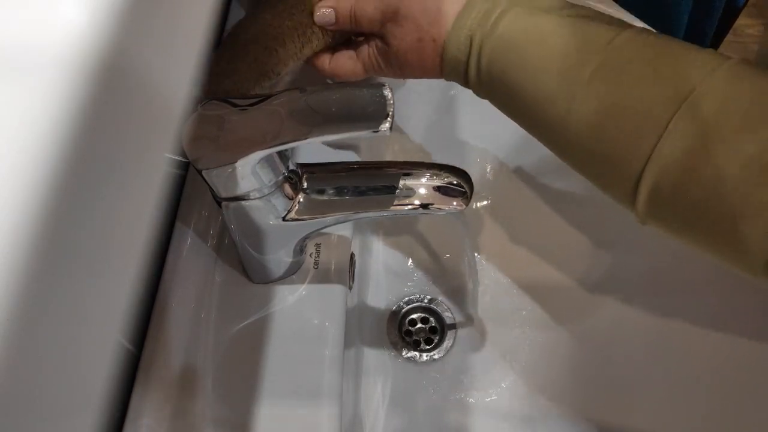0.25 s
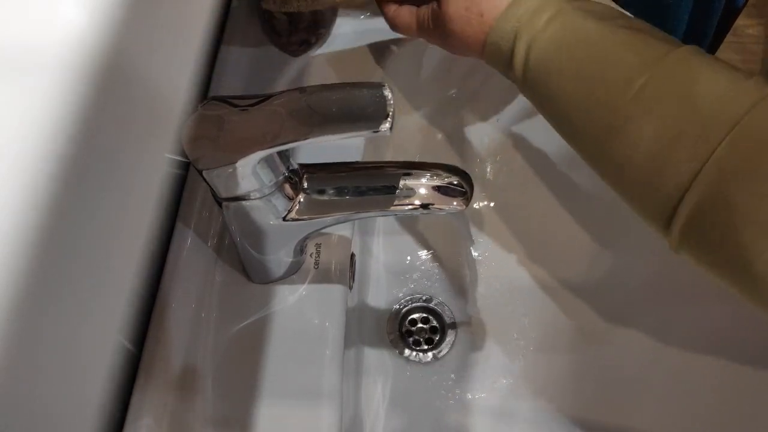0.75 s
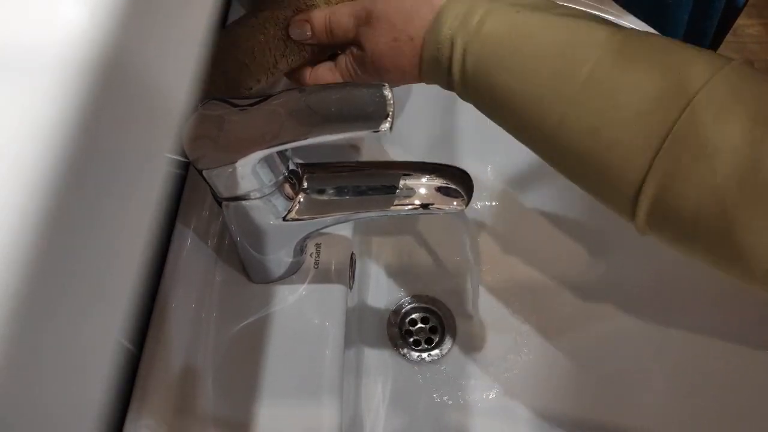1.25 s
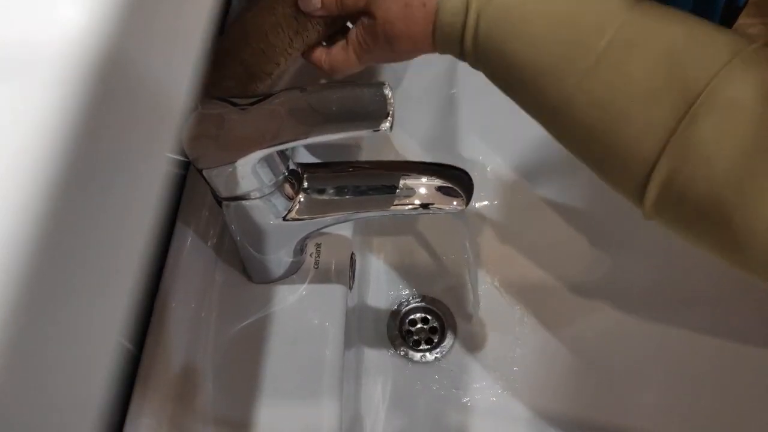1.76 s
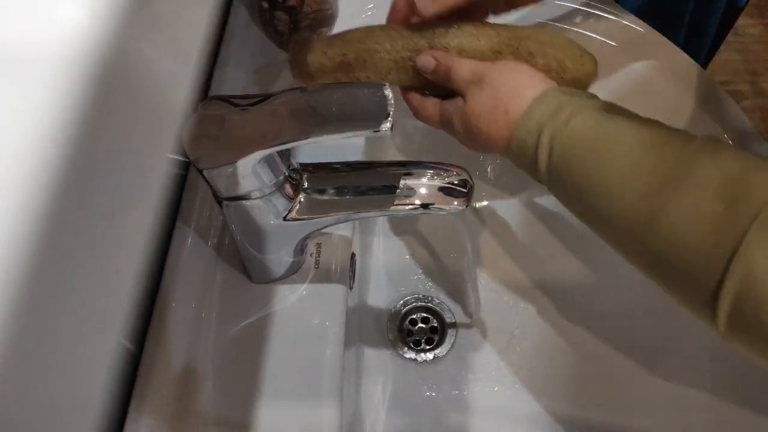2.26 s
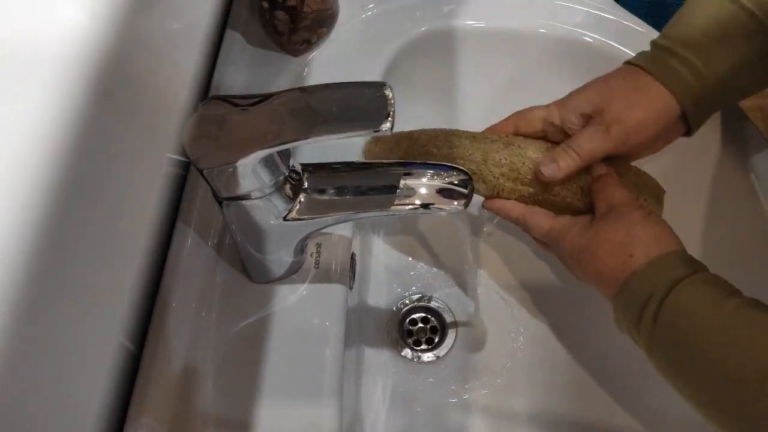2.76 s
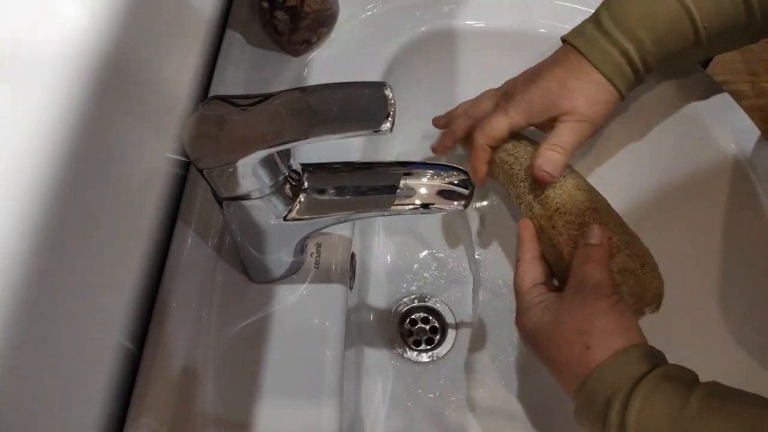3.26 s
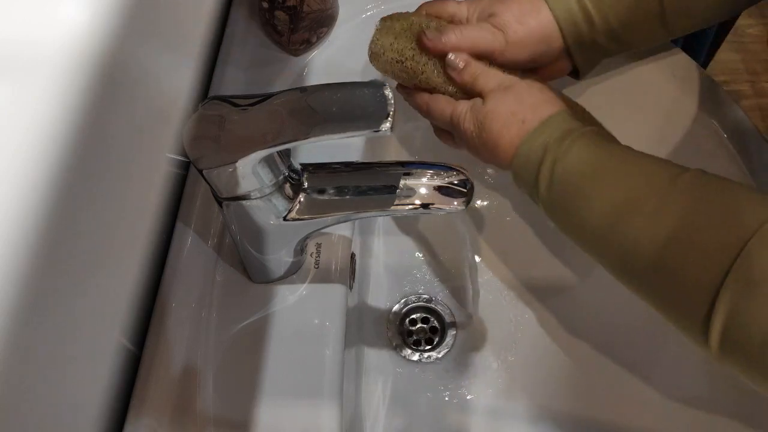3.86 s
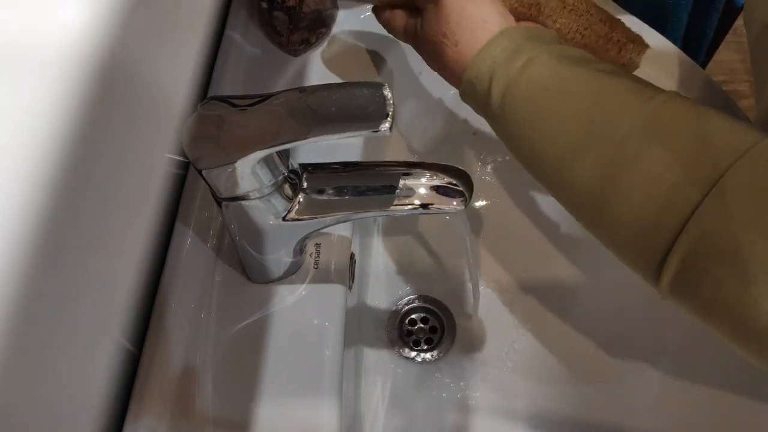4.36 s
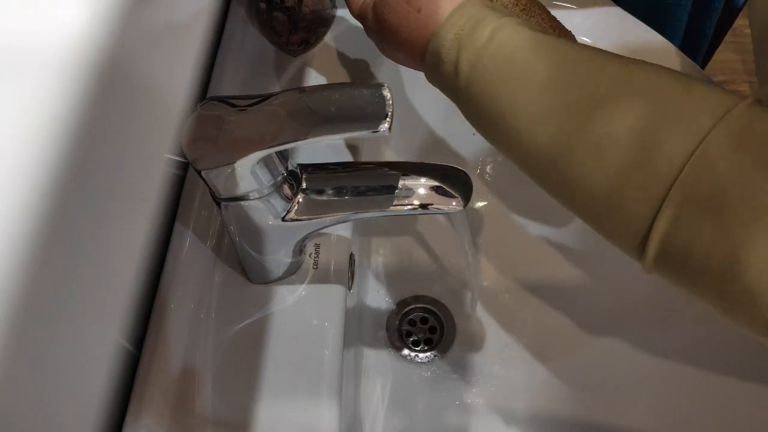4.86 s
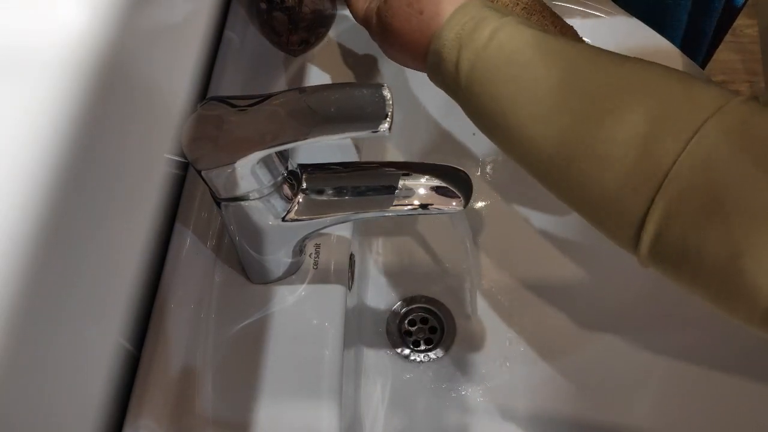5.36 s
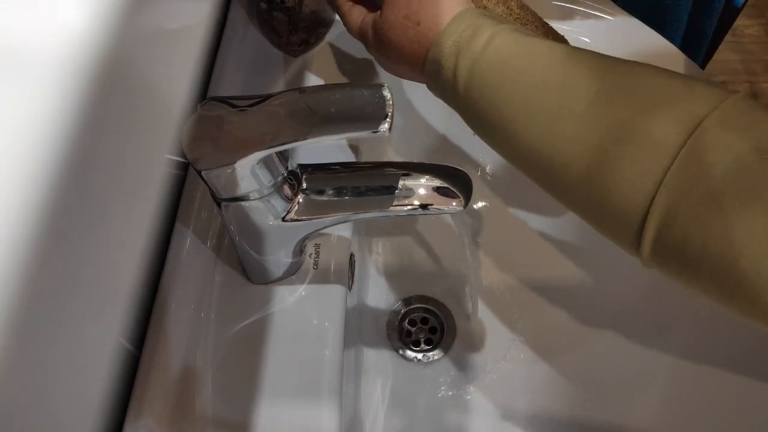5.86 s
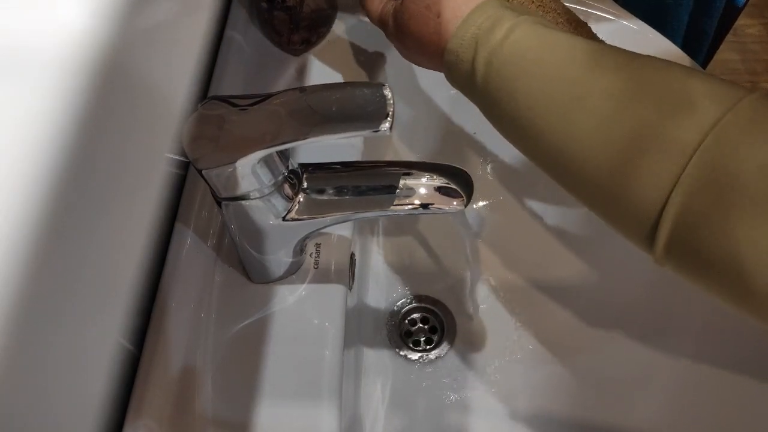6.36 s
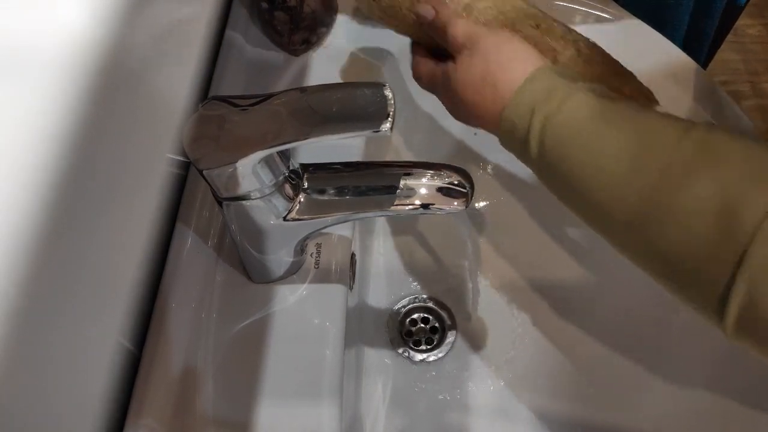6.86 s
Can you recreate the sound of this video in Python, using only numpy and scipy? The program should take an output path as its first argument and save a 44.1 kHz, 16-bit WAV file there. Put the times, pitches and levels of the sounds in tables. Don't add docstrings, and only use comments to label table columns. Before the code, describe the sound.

A thin stream from a tap spatters into a ceramic basin throughout, close and wide in stereo: a bright, dense fizz of tiny bubbles over a smooth hiss, with sharper pops and snaps scattered through it. The flow flutters slightly, surging around 0.65 s and dipping briefly near 0.95, 3.7 and 4.9 s. From 0 to 2.2 s a wet sponge and a stone knock the hollow bowl with short, woody thuds, strongest near 0.3 s, with soft rubbing. Afterwards knocks are sparse and faint, and low gurgling rises in the drain, fullest from 2.9 to 4.1 s. Firmer taps return around 4.5 to 5.5 s. From 5.5 to 6.9 s quick, uneven knocks rattle far out on the rim, louder near 6.3 to 6.6 s, with rubbing and one bright plink at 6.5 s as the gurgle thins. Faint watery rush, low hum and short tile echoes remain until 7.1 s.

```python
import sys
import numpy as np
from scipy import signal
from scipy.fft import rfft, irfft, next_fast_len
from scipy.io import wavfile
from scipy.ndimage import uniform_filter1d

SR = 44100
rng = np.random.default_rng(int(sys.argv[2]) if len(sys.argv) > 2 else 0)


def gain_from_db(level_db):
    decades = np.asarray(level_db, float) / 20
    return 10 ** decades


def inscribe(sig):
    pcm = np.round(np.clip(np.atleast_2d(sig).T, -1, 1) * 32767)
    wavfile.write(sys.argv[1], SR, pcm.astype(np.int16))


N = 313551


def stream(bubbles_per_s=4000., spread_db=2.0, sizes=36):
    everywhere = splashes(75., fade_s=0.0037)
    groups = [splashes(40., fade_s=0.006) for _ in range(9)]
    fizz = np.zeros((2, N))
    for k, hz in enumerate(np.geomspace(2200., 15300., sizes)):
        cycles, glide, lag, pan = rng.random(4)
        busy = 0.8 + 0.5 * everywhere + 1.6 * groups[k * 9 // sizes]
        chance = bubbles_per_s / sizes / SR * busy
        draw = rng.random(N)
        at = np.flatnonzero(draw < chance)
        rare = np.minimum(-np.log(draw[at] / chance[at] + 1e-9), 2.6)
        train = np.zeros(N)
        train[at] = gain_from_db(spread_db * rare) * busy[at] ** 0.39 * np.sqrt(hz)
        shape = bubble(hz, 1.37 + hz / 2500 + 6.9 * cycles ** 2, 0.27 * glide)
        grain = signal.oaconvolve(train, shape / np.linalg.norm(shape))[:N]
        left = grain * gain_from_db(10.6 * (pan - 1.5))
        right = np.roll(grain, int(12 * (lag - 0.5))) * gain_from_db(5.9 * (-0.5 - pan))
        fizz += [left, right]
    fizz = whitened(fizz + gain_from_db(-4.0) * room(fizz))
    fizz = evened(colour(fizz, lambda f: gain_from_db(spatter_db(f))))
    hiss = noise(spatter_db, 0.95, across=8, along=6) * (1 + 0.28 * everywhere)
    mix = evened(fizz + gain_from_db(-2.5) * evened(hiss))

    change_db = surge_db()
    tilt = np.clip(0.28 + 0.18 * change_db, -4, 4)
    bright = colour(mix, lambda f: np.log2((f + 500) / 9000) * np.log(10) / 20)
    return gain_from_db(-44 + change_db + 2.5) * (mix + tilt * bright) * gain_from_db([[-0.35], [0.35]])


def splashes(per_s, fade_s):
    size = np.minimum(rng.exponential(1, N), 2.2)
    lands = size * (rng.random(N) < per_s / SR)
    return signal.lfilter([1], [1, -np.exp(-1 / (fade_s * SR))], lands)


# peak_s, change_db, build_s, ebb_s
SURGES = [(0.0, 1.5, .05, 0.18), (0.26, 3, 0.032, 0.074), (0.371, 2, 0.015, 0.33),
          (0.65, 6.5, 0.043, 0.018), (0.952, -5, 0.016, .002), (1.03, 2, .34, 0.031),
          (1.23, 2.5, 0.066, 0.0085), (2.1, 2.5, 0.093, 0.036), (2.14, -1, 0.024, .02),
          (2.16, 3, 0.018, 0.055), (2.77, 0, 0.12, 0.42), (3.668, -8, 0.021, .004), (3.69, 4, .018, 0.051),
          (3.76, 0.7, .08, 1), (4.87, -5.5, 0.027, 0.026), (5.35, 1.8, 0.066, 0.11),
          (5.6, 1.5, 0.023, 0.13), (5.8, -0.5, 0.16, .1), (6.0, 1, 0.11, 0.38), (6.38, 1, 0.32, 0.11),
          (6.69, 4.5, 0.084, 0.062), (6.87, 2.5, 0.11, 0.026), (7.11, 0.5, 0.15, .05)]


def surge_db():
    t = np.arange(N) / SR
    return sum(np.interp(t, [s - build, s, s + ebb], [0, db, 0]) for s, db, build, ebb in SURGES)


# pitch_hz, level_db (per Hz)
FIZZ = [(590, -23), (1000, -20.5), (1560, -8), (1690, -32), (1770, -11), (1940, -12.5), (2710, -10.5),
        (3040, -8.5), (3740, -4), (7270, 2), (11400, -1.5), (13800, -2.5), (15700, -3.5)]
# pitch_hz, width_hz, level_db
GLAZE = [(1775, 60, -18), (2130, 60, 39), (2610, 215, 33), (3572, 62, -45), (5000, 40, 6), (5380, 29, 32),
         (6300, 120, -19), (7160, 26, -17), (8400, 16, -3), (9150, 20, -23), (11050, 100, -33),
         (14200, 3160, -20)]


def spatter_db(hz):
    rings = sum(1 / (1 + (2 * (hz - f) / width) ** 2) * (8.0 + 0.041 * db) for f, width, db in GLAZE)
    return read(FIZZ, hz) + rings


# start_s, peak_db, pitch_hz
BIG_BUBBLES = [(0.016, -27, 13600), (0.3681, -24.5, 8400), (0.437, -29, 7050), (0.4581, -26, 9730),
               (0.504, -26, 12100), (0.524, -30, 6140), (0.9532, -31, 9400), (1.0026, -31, 6870),
               (1.486, -29.5, 6460), (1.6517, -23.5, 10900), (1.8108, -23, 14200), (1.977, -24.5, 8100),
               (2.2074, -25.5, 5900), (2.32, -31.5, 7900), (2.451, -29, 9170), (3.226, -27, 7100),
               (3.278, -28, 6900), (3.6197, -31.5, 6300), (3.68, -26, 5600), (3.7, -22.5, 8850),
               (3.738, -31, 8350), (4.386, -31.5, 5760), (4.674, -31, 8300), (5.4168, -29.5, 7960),
               (5.671, -27, 8900), (5.855, -27, 14400), (6.047, -31, 14000), (6.059, -26.5, 6000),
               (6.311, -27, 13100), (7.073, -23, 14100),
               (0.3193, -32, 3770), (0.382, -33, 5380), (2.4763, -36, 5200), (2.7405, -31, 5100),
                (3.2026, -30, 5000), (3.6728, -26, 4830), (3.6795, -34, 3750), (3.9923, -34, 4400),
                (4.2732, -48, 5030), (5.3497, -30, 5000), (6.3134, -32, 5270)]
# start_s, level_db, pitch_hz
SMALL_BUBBLES = [(0.0362, -45, 4600), (0.0613, -35, 14500), (0.078, -41, 5930), (0.2366, -42, 5930),
                 (0.249, -39, 6500), (0.2611, -39, 6400), (0.3389, -49, 3780), (0.3999, -37, 7100),
                 (0.425, -39, 7090), (0.45, -37.0, 7760), (0.5146, -40, 7090), (0.532, -36, 8550),
                 (0.6169, -39, 4900), (0.628, -42, 5930), (0.6416, -41, 7090), (0.8972, -39, 5430),
                 (0.91, -38, 4570), (0.921, -36, 9270), (0.965, -51, 3800), (1.0173, -38, 9400),
                 (1.0287, -41, 6490), (1.1412, -54, 3840), (1.1722, -38, 6400), (1.1876, -33, 14500),
                 (1.2099, -32, 14500), (1.3445, -39, 5860), (1.415, -51, 3800), (1.441, -40, 5830),
                 (1.6277, -38, 5430), (1.6929, -41, 5930), (1.785, -35, 6490), (1.8446, -39, 6400),
                 (2.0656, -36, 8480), (2.0872, -33.5, 6500), (2.153, -41, 5460), (2.162, -43.0, 3800),
                 (2.1702, -45, 6490), (2.1833, -43, 7800), (2.2545, -39, 9270), (2.326, -38, 6540),
                 (2.3375, -37, 7760), (2.4223, -37, 7760), (2.4942, -38, 5000), (2.5144, -31, 14300),
                 (2.564, -42, 6490), (2.6435, -37, 7050), (2.7102, -34, 7090), (2.75, -42, 4540),
                 (2.771, -40, 4200), (2.7804, -39, 7090), (2.8016, -38, 5960), (2.8112, -32, 14500),
                 (2.83, -36, 7760), (2.9216, -36, 8480), (2.9357, -41, 6490), (3.0194, -38, 7000),
                 (3.0403, -45.5, 4180), (3.0892, -33, 8400),
                 (3.1611, -35.5, 6400), (3.248, -36, 7050), (3.2677, -40, 6400), (3.3083, -37, 7700),
                      (3.3616, -36, 7000), (3.42, -34, 11090), (3.4806, -33, 14600), (3.516, -36, 6460),
                      (3.639, -42, 5460), (3.7241, -35, 7700), (3.7473, -36, 9270), (3.933, -36, 11200),
                      (4.065, -43, 6490), (4.1684, -39, 8480), (4.1761, -44, 6500), (4.3291, -45, 4540),
                      (4.343, -31.5, 7760), (4.3565, -38, 4670), (4.4346, -44, 3830), (4.446, -33.5, 6540),
                      (4.4618, -40, 7760), (4.5207, -40, 4960), (4.7003, -35.5, 6450),
                      (4.7842, -35.0, 14500), (4.9112, -46, 4150), (4.93, -35.0, 14500),
                      (4.999, -34.0, 14500), (5.0146, -38.0, 7100), (5.114, -35, 7760), (5.362, -34, 6490),
                      (5.471, -44, 3800), (5.6402, -36, 7800), (5.8908, -37, 7050), (6.0146, -37, 6490),
                      (6.0364, -45, 3830), (6.116, -34.0, 7040), (6.1675, -38, 6490), (6.2128, -39, 7090),
                      (6.2271, -36.0, 7090), (6.3255, -34, 9270), (6.3654, -37, 6490), (6.4194, -43, 3800),
                      (6.4353, -37, 6490), (6.5805, -38, 4540), (6.618, -46, 3780), (6.6704, -40, 4500),
                      (6.688, -34, 7760), (6.7074, -36.0, 7760), (6.7251, -39, 7050), (6.7668, -40, 7090),
                      (6.7822, -37, 7760), (6.8391, -39, 7640), (6.8495, -33.0, 14500), (6.8724, -35, 7800),
                      (6.991, -40, 7760), (7.0287, -36.0, 14500), (7.084, -38, 7800), (7.1037, -38, 7090)]
# start_s, peak_db
SNAPS = [
    (0.955, -30),
    (1.0038, -27),
    (1.018, -33),
    (1.486, -29),
    (1.9765, -28),
    (3.6735, -32),
    (3.7, -30),
    (6.059, -31),
]


def pops():
    out = np.zeros((2, N))
    small_ones = [(s, db + 5, hz) for s, db, hz in SMALL_BUBBLES]
    for s, db, hz in BIG_BUBBLES + small_ones:
        cycles, glide, lag, pan = rng.random(4)
        sweep = (0.301 + 0.29 * glide) * min(7000 / hz, 1)
        body = gain_from_db(db - 3.0) * bubble(0.85 * hz, 4.2 + hz / 4000 + 1.5 * cycles, sweep)
        snap = gain_from_db(db - 9.0) * bubble(min(1.7 * hz, 14e3), 2.8, 0.12)
        for part in (body, snap):
            add(out[0], s, part * gain_from_db(1.6 * pan + 4.0))
            add(out[1], s + 0.00011 * lag, part * gain_from_db(7.0 - 2.8 * pan))
        for side, wait, pitch in rng.random((10, 3)):
            weak = bubble(min(hz * 1.6 ** (1.1 * pitch - 0.35), 15e3), 4.6, 0.13)
            level = gain_from_db(db - 2.5 - 3.8 * wait) * min(hz / 6000, 1) ** 3
            add(out[int(2 * side)], s + 0.0022 + 0.007 * wait ** 2, level * weak)
    for s, db in SNAPS:
        add(out, s, gain_from_db(db) * np.outer([1, 1.1], bubble(9000., 1.5, 0.26)))
    return out + gain_from_db(-4.0) * room(out)


def bubble(hz, cycles, glide):
    u = np.arange(int(1.5 * cycles * SR / hz) + 2) * hz / SR / cycles
    turns = cycles * (u + glide * u ** 2 / 2)
    below_edge = hz * (1 + glide * u) < SR / 2
    return np.sin(2 * np.pi * turns) * u * np.exp(1 - u) * np.exp(-u ** 2 / 2) * below_edge


# pitch_hz, level_db, fade_s (to fall 60 dB)
BASIN = [(168.3, 0, 0.2), (233, -3.5, 0.16), (280.7, -0.5, 0.2), (355.4, -12.5, 0.26), (378, 1, 0.095),
         (471.4, 1, 0.09), (544, -10, 0.032), (616, -22, 0.29), (671, -1, 0.068), (752.4, -2, 0.2),
         (833, -9, 0.12), (946, 4, 0.052), (1080, -2, 0.054), (1208, 0.5, 0.07), (1440, -9, 0.04),
         (1555, 4, 0.056), (1636, -3, 0.061), (2032, -4.5, 0.048), (2632, -7, 0.066)]
# pitch_hz, phase_radians
PORTS = [(150, 0.027), (400, 0.053), (600, 0.2), (1500, 0.8), (3000, 1.2)]
# start_s, blow_db, weight_db, hardness_db (both relative), boom_over_belly_db
TIP_KNOCKS = [(0.003, -48, -10.5, -10.5, -2.5), (0.143, -55.5, 3, -8, -3.5), (0.447, -35.5, -14, -2, 1),
              (0.582, -48, -12, -34, -5), (0.719, -60, 1.5, 0, -5), (0.805, -54, 3, -5, 0),
              (0.843, -38.5, -11, -3, -1.5), (1.136, -37, -11, -1.5, 1.5), (1.411, -37, -13, -0.5, -6.5),
              (1.448, -46, -0.5, -18, -1.5), (1.689, -39, -7, -1.5, -3), (1.988, -38, -11.5, -4.5, -1.5),
              (2.114, -52, -3.5, -5, -1), (2.741, -58, -8, -15, -6), (3.125, -57, -30, -19, -4),
              (4.071, -53.5, -15, -3, -7), (4.32, -54, -5, -12, -2), (4.65, -54, -11, -8, -2),
              (4.78, -50, 1, -11, -3), (5.009, -41.5, -12.5, -4, -4), (5.333, -52.5, -5, -8, 2.5),
              (5.412, -44.5, -12, -12, 1), (5.479, -47.5, -6.5, -4, 8)]
# start_s, blow_db, weight_db, hardness_db (both relative), boom_over_belly_db
FLAT_KNOCKS = [
    (0.213, -36, -12.5, -8.5, -2.5),
    (0.317, -30, -7.5, -4.5, -4),
    (1.258, -44, -7, -5, -1.5),
    (2.16, -34.5, -5.5, -2, -5),
    (4.543, -43, -16, -7.5, 1),
    (5.433, -38, -11, -8, -3),
]
# start_s, blow_db, weight_db, hardness_db (both relative), boom_over_belly_db
FAR_KNOCKS = [(5.515, -54, -5, -12, 3), (5.585, -64, -2, -16, 6), (5.685, -66, -13, -6, -1),
              (5.729, -46.5, -2, -13, 0.5), (5.742, -50, -1, -1, 1), (5.785, -52, -4, -11, 7),
              (5.82, -50, -22, -7, -2), (5.935, -48, -6, -4, 6.5), (5.95, -52.5, -7, 0.5, -9),
              (5.98, -56, 0, -3, 6), (6.069, -49, -2, -16, 5), (6.104, -48.5, -10, -8, 2),
              (6.116, -43, -9, -3, 0), (6.126, -43, -11, -5, 5), (6.14, -50.5, -7, -1, 6),
              (6.278, -38, -9, -7, 4.5), (6.417, -47, -19, -2, 3), (6.425, -37, -10.5, -5.5, 2),
              (6.565, -48.5, -6, -2, 6), (6.613, -33.5, -13.5, -8, 3.5), (6.72, -45.5, -4.5, -1.5, 7),
              (6.848, -48.5, -5, -9, 5)]


def basin():
    hz = np.transpose(BASIN)[0][:, None]
    lead = np.array([[[0.5]], [[-0.5]]]) * read(PORTS, hz) * rng.choice([-1, 1], hz.shape)
    out = np.zeros((2, N))
    for knocks, rim_db, wall_db in ((TIP_KNOCKS, -9.5, -0.5), (FLAT_KNOCKS, 1.5, -1), (FAR_KNOCKS, -4, -1)):
        for s, blow_db, *touch in knocks:
            add(out, s + 0.00116, gain_from_db(blow_db) * knock(*touch, rim_db, wall_db, lead))
    out += rubbing(lead)
    out = signal.sosfilt(signal.butter(6, 138., "high", fs=SR, output="sos"), out)
    return out * gain_from_db([[-0.6], [0.6]])


def knock(weight_db, hard_db, lean_db, contact_db, wall_db, lead):
    t = np.arange(SR // 5) / SR
    hz, db, t60 = np.transpose(BASIN)[:, :, None]
    boom_db, belly_db = weight_db + lean_db, weight_db - lean_db
    rim_db = contact_db + 0.7 * hard_db
    spot = [(185, boom_db + 6.0), (215, belly_db + 8.0), (310, belly_db + 2.0), (345, 0),
            (470, wall_db), (560, wall_db), (660, 0),
            (760, 0.9 * rim_db - 3.5), (860, rim_db + 0.4), (1000, rim_db + 0.27),
            (1150, hard_db), (1500, hard_db - 6.0), (2500, 1.62 * hard_db + 8.0)]
    level, detune, phase = rng.standard_normal((3, len(BASIN), 1))
    gain = gain_from_db(db + read(spot, hz) - 7.0 + 2.4 * level - 60 * t / t60 / (1 + 0.03 * detune))
    rise = 1 - np.exp(-t * hz * 2.93)
    press = 1 + 1.18 * np.exp(-t / 0.0022)
    swing = np.sin(2 * np.pi * hz * (1 + 0.0059 * detune) * t + np.pi + 0.51 * phase + lead)
    modes = (gain * rise * press * swing).sum(1)
    return modes + gain_from_db(-3.5) * clatter(t, spot)


# pitch_hz, level_db
CRACK = [(90, -40), (150, 6), (300, -3.5), (1000, 5.5), (1300, 4.5), (1900, -8), (3300, -8), (4500, -23.5),
         (9000, -58)]


def clatter(t, spot):
    hz, frames, (a, b) = signal.stft(rng.standard_normal((2, len(t))), SR, nperseg=512, noverlap=384)
    apart = np.clip(read(PORTS, hz) / 0.82, 0, 1)[:, None]
    z = np.array([a, np.sqrt(1 - apart ** 2) * a + apart * b])
    db = read(CRACK, hz) + read(spot, hz) + 2.1 * rng.standard_normal(len(hz))
    fade_db = -60 * frames / read(ROOM, hz)[:, None] / 0.72
    x = signal.istft(z * gain_from_db(db[:, None] + fade_db), SR, nperseg=512, noverlap=384)[1]
    bumps = gain_from_db(evened(uniform_filter1d(rng.standard_normal(len(t)), 150)))
    attack = (1 - np.exp(-t / 0.00033)) * (1 + 3.44 * np.exp(-t / 0.015))
    return bumps * x[:, :len(t)] * attack


# start_s, effort_db
RUBBING = [(0.0, -68), (0.2, -67), (0.3, -71), (1.0, -66), (1.07, -73), (1.3, -72), (1.96, -65),
           (2.1, -60.5), (2.26, -70), (2.55, -74), (3.1, -66.5), (4.5, -72), (4.91, -62), (5.35, -70),
           (6.08, -60), (6.38, -68), (6.8, -62), (7.11, -78)]


def rubbing(lead):
    t = np.arange(SR // 5) / SR
    hz, db, t60 = np.transpose(BASIN)[:, :, None]
    scrape = rng.standard_normal(N) * gain_from_db(2.8 * drift(2.5, 25.0))
    gain = gain_from_db(db - 60 * t / t60 / 0.42 - 1.7 * np.log2(hz / 170))
    ring = (gain * np.sin(2 * np.pi * hz * t + lead)).sum(1)
    rubbed = signal.oaconvolve(scrape[None], ring, axes=1)[:, :N]
    return gain_from_db(curve(RUBBING, axis=1) + 0.5) * evened(rubbed)


# start_s, flow_db
GURGLE = [
    (0.0, -79),
    (1.5, -77),
    (2.1, -69.5),
    (2.9, -62.5),
    (4.1, -62.5),
    (4.6, -66.5),
    (6.0, -67.5),
    (6.4, -76),
    (7.11, -68),
]
# pitch_hz, width_hz, level_db
PIPE = [
    (590, 120, 0),
    (730, 84, 3),
    (311.7, 13.3, 10.5),
]
# start_s, peak_db, pitch_hz
GLUGS = [
    (2.735, -56, 310),
    (3.11, -53, 600),
    (3.115, -54, 735),
    (3.43, -56, 590),
    (3.51, -58, 214),
    (4.06, -58, 722),
    (4.23, -59, 730),
    (4.31, -56, 289),
    (6.511, -43, 4040),
]


def drain():
    bubbles, glugs = np.zeros((2, N)), np.zeros(N)
    for hz in (348.0, 524.0, 586.0, 679.0, 870.0):
        train = gain_from_db(2.1 * rng.exponential(1, (2, N))) * (rng.random((2, N)) < 120. / SR)
        bubbles += signal.oaconvolve(train, bubble(hz, 3.2, 0.1)[None], axes=1)[:, :N]
    piped = np.zeros((2, N))
    for hz, width, db in PIPE:
        moving_hz = hz * (1 + 0.034 * drift(0.5, 3.7))
        piped += gain_from_db(db) * resonate(bubbles, moving_hz, 1.15 * width)
    near, far = piped
    for s, db, hz in GLUGS:
        add(glugs, s, gain_from_db(db) * bubble(hz, 3.5 + hz / 60, 0.027))
    both = evened(np.array([near + 0.053 * far, near - 0.16 * far]))
    return gain_from_db(curve(GURGLE, axis=1) - 3.0) * both + glugs


def resonate(x, hz, width_hz):
    turn = np.exp(2j * np.pi * np.cumsum(hz) / SR)
    r = np.exp(-np.pi * width_hz / SR)
    return 2 * (turn * signal.lfilter([(1 - r) ** 2], [1, -2 * r, r * r], x / turn)).real


# pitch_hz, level_db (per Hz)
WASH = [(26, -53), (45, -1), (59, -2), (75, -9), (161, -25), (193, -32), (220, -6.5), (254, -25), (305, -8),
        (415, -17.5), (717, -16), (1070, -24), (1780, -10.5), (1950, -11.5), (3500, -11), (4550, -50),
        (7700, -120)]


def wash():
    level_db = -58.5 - 1.97 + 0.76 * drift(0.77, 36.0)
    return gain_from_db(level_db) * noise(lambda f: read(WASH, f), 1.1, across=3, along=14)


def hum():
    a, b = rng.standard_normal((2, N))
    sides = np.array([a + 0.2 * b, a - 0.2 * b])
    tone = evened(colour(sides, lambda f: 1 / (1 + ((f - 27.) / 11.) ** 2) ** 1.6))
    level = np.sqrt(uniform_filter1d(tone.mean(0) ** 2, 5000) + 0.087)
    return gain_from_db(-57.5 - 2 * drift(0.3, 1.6)) * tone / level


# pitch_hz, fade_s (to fall 60 dB)
ROOM = [(150, 0.45), (500, 0.14), (2000, 0.24), (8000, 0.029), (16000, 0.13)]


def room(x, start=120):
    size = SR // 2
    taps = np.zeros((2, size))
    at = np.arange(int(start), size - 20, 20)
    at = at + rng.integers(0, 20, (2, len(at)))
    np.put_along_axis(taps, at, rng.choice([-1., 1.], at.shape), 1)
    hz, t, (a, b) = signal.stft(taps, SR, nperseg=256)
    same = np.clip(read(SAME, hz), 0, 1)[:, None]
    z = np.array([a, same * a + np.sqrt(1 - same ** 2) * b])
    tail = signal.istft(z * gain_from_db(-60 * t / read(ROOM, hz)[:, None]), SR, nperseg=256)[1]
    return signal.fftconvolve(x, tail / np.linalg.norm(tail[0]), axes=1)[:, :N]


# pitch_hz, likeness (1 = same)
SAME = [(80, 0.31), (160, 1), (550, 1), (1650, 0.43), (5000, 0.42), (15000, 0.35)]
# pitch_hz, phase_radians
LEAD = [(0, 1), (1380, -1.26), (2070, 6), (3450, 0.5), (4220, -9), (5860, 10), (6290, 1), (8350, 10.5),
        (9910, -6), (10900, -9), (11200, -1.5), (12100, -26), (14000, -2.5), (16600, -15)]


def noise(shape_db, patchy_db, across, along):
    frames, hz = N // 128 + 5, np.fft.rfftfreq(512, 1 / SR)
    a, b, c, d, patches = rng.standard_normal((frames, 257, 5)).T
    patches = evened(uniform_filter1d(uniform_filter1d(patches, across, 0), along, 1))
    same = np.clip(read(SAME, hz), -1, 1)[:, None]
    turn = np.exp(-1j * read(LEAD, hz))[:, None]
    left = a + 1j * b
    right = same * turn * left + np.sqrt(1 - same ** 2) * (c + 1j * d)
    z = np.array([left, right]) * gain_from_db(patchy_db * patches)
    x = signal.istft(z, nperseg=512, noverlap=384)[1][:, :N]
    return evened(colour(x, lambda f: gain_from_db(shape_db(f))))


def drift(low_hz, top_hz):
    gain = lambda f: (f > low_hz) / np.sqrt(f + 1) / (1 + (f / top_hz) ** 4)
    return evened(colour(rng.standard_normal(N), gain))


def whitened(x, size=3000):
    length = next_fast_len(N)
    z = rfft(x, length)
    power = uniform_filter1d(abs(z) ** 2, size, axis=-1)
    return irfft(z / np.sqrt(power + 1e-9 * N), length)[:, :N]


def colour(x, gain):
    size = next_fast_len(N + 4096)
    return irfft(rfft(x, size) * gain(np.fft.rfftfreq(size, 1 / SR)), size)[..., :N]


def evened(x):
    return x / np.sqrt(np.mean(x ** 2) + 1e-20)


def read(points, hz):
    f, value = np.transpose(points)
    return np.interp(np.log(hz + 1), np.log(f + 1), value)


def curve(rows, axis):
    rows = np.array(rows)
    return np.interp(np.arange(N) / SR, rows[:, 0], rows[:, axis])


def add(mix, s, sound):
    part = mix[..., round(s * SR):][..., :sound.shape[-1]]
    part += sound[..., :part.shape[-1]]


def scene():
    bowl = basin()
    bowl = gain_from_db(2.0) * bowl + gain_from_db(-8.0) * room(bowl)
    return stream() + pops() + bowl + drain() + wash() + hum()


def roll_off(x):
    return signal.sosfilt(signal.butter(12, 17020, fs=SR, output="sos"), x)


def record(dry):
    low_pass = signal.firwin(511, 15790, window=("kaiser", 9), fs=SR)
    mix = signal.oaconvolve(dry, low_pass[None], "same")
    return roll_off(mix)


dry = scene()
out = record(dry)
inscribe(out)
```